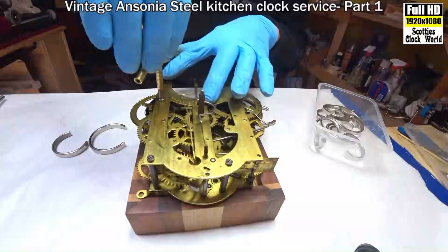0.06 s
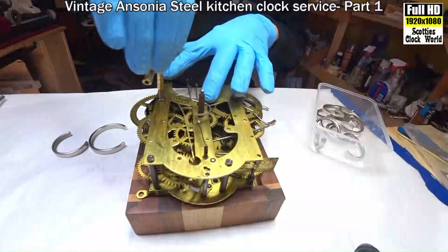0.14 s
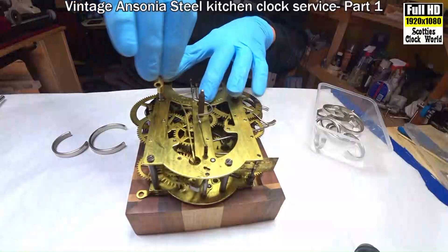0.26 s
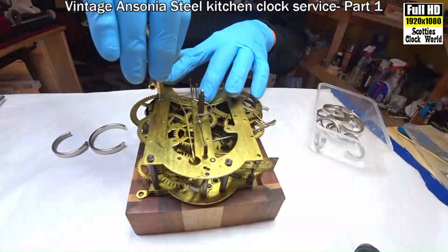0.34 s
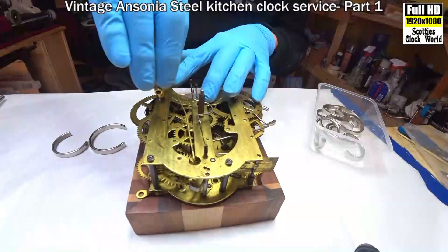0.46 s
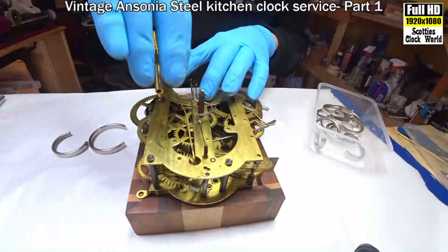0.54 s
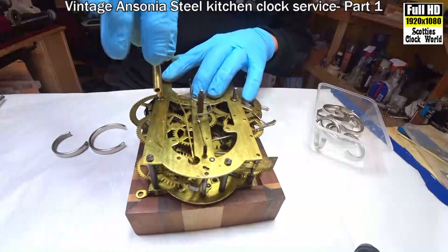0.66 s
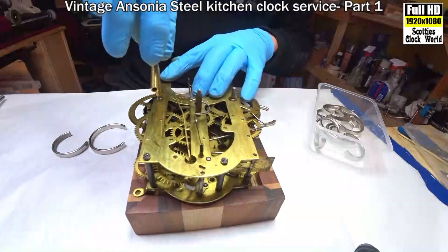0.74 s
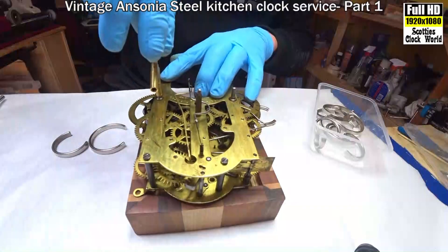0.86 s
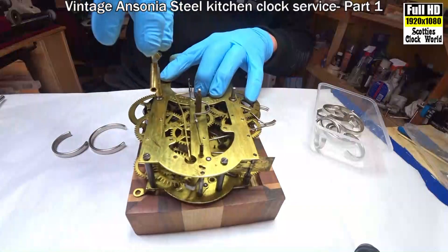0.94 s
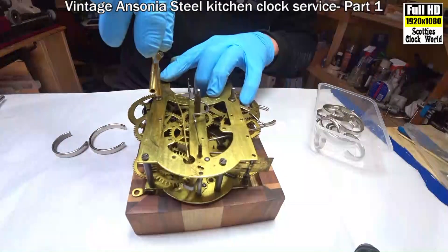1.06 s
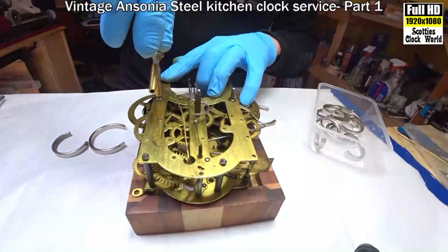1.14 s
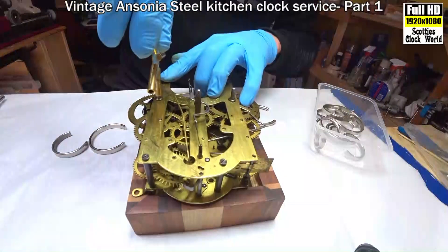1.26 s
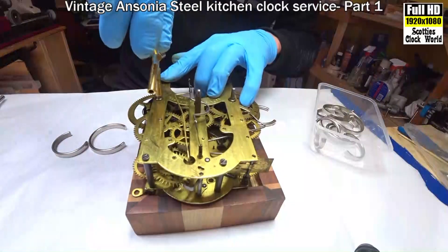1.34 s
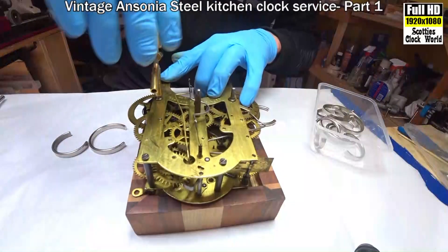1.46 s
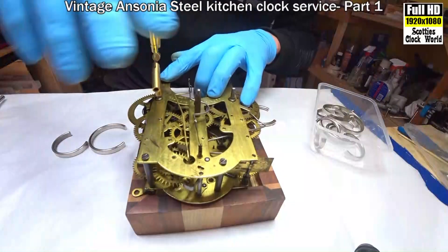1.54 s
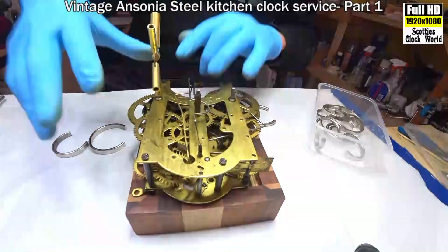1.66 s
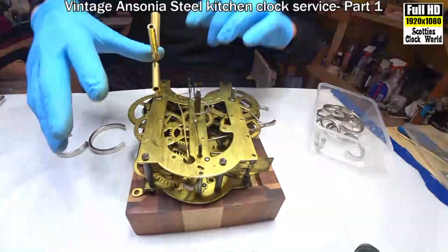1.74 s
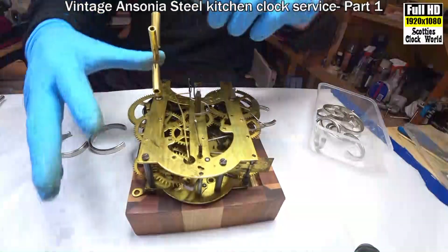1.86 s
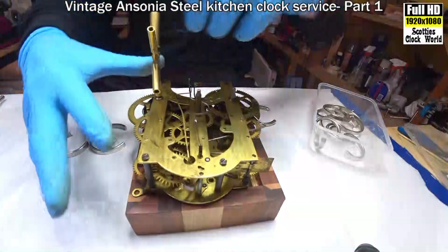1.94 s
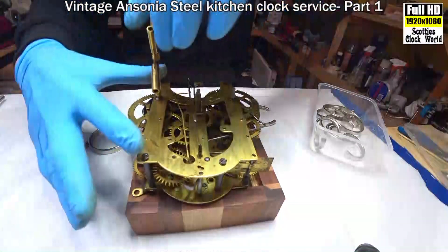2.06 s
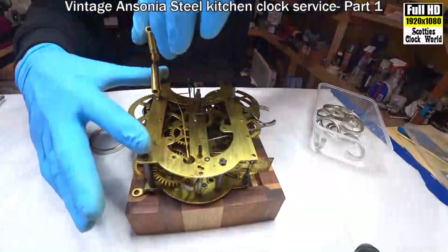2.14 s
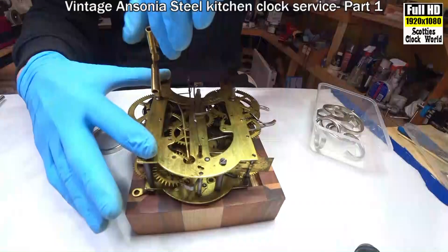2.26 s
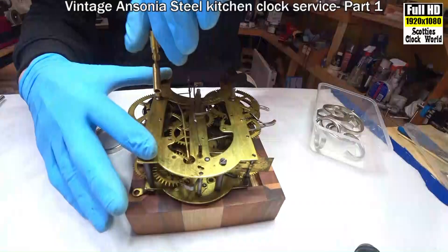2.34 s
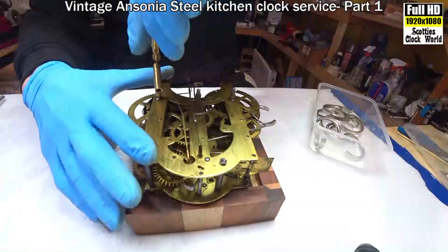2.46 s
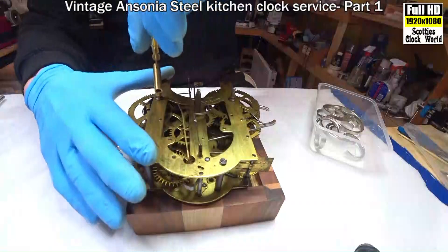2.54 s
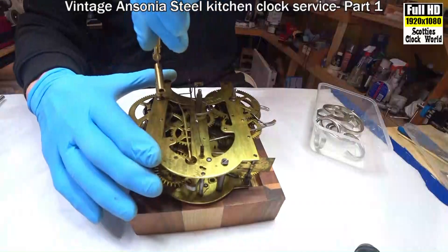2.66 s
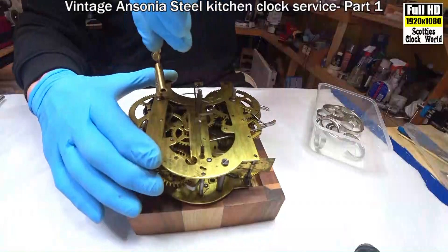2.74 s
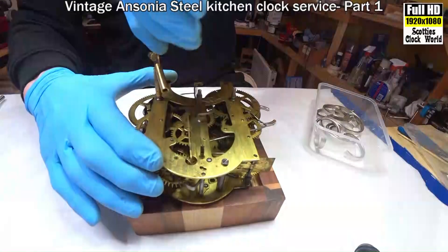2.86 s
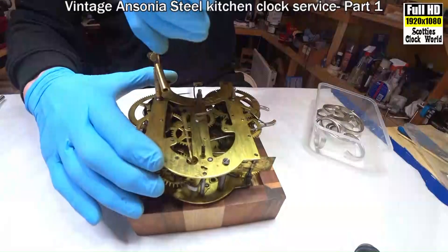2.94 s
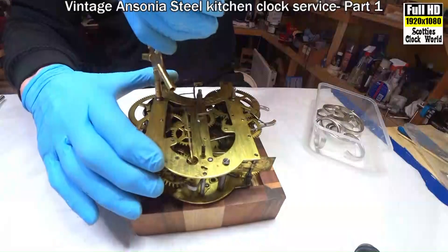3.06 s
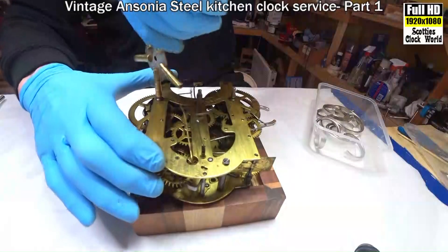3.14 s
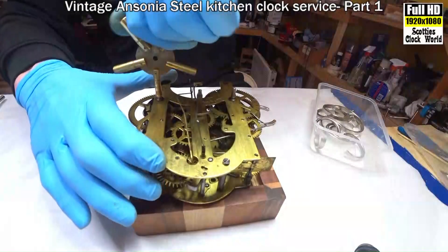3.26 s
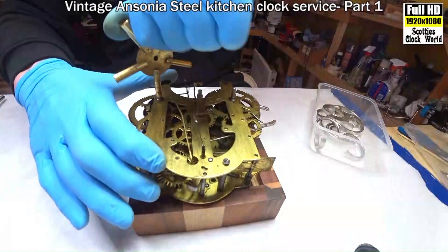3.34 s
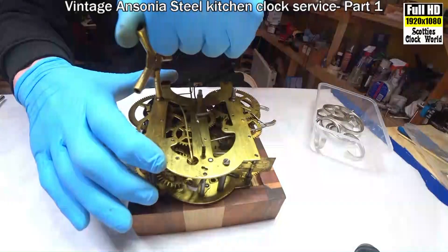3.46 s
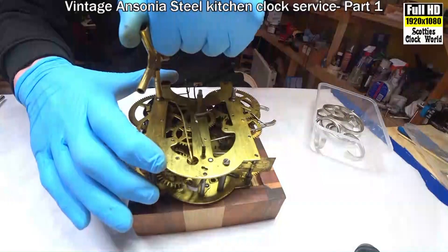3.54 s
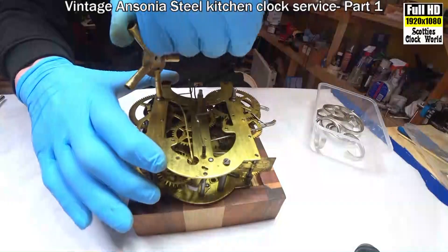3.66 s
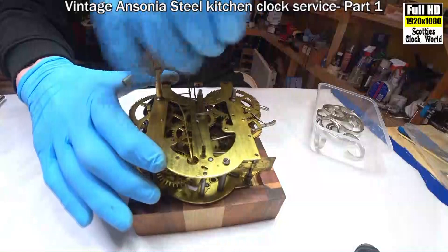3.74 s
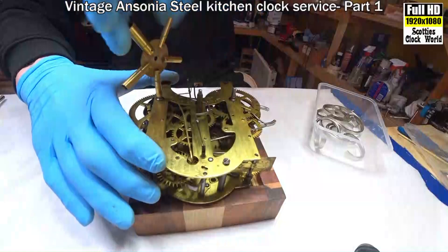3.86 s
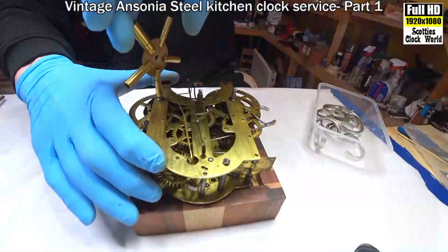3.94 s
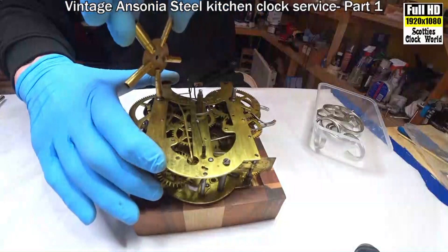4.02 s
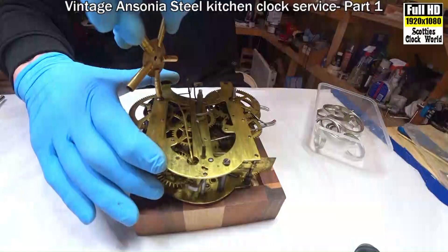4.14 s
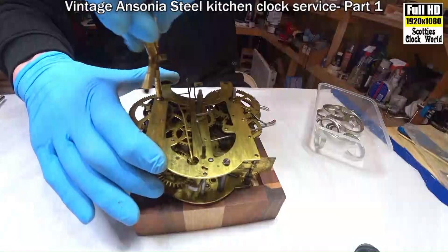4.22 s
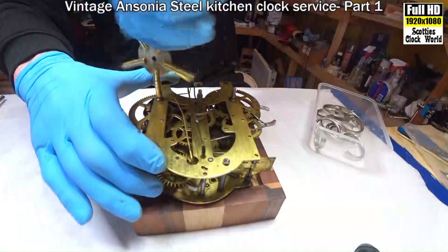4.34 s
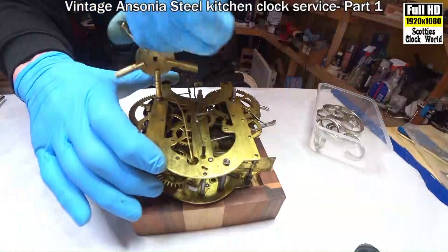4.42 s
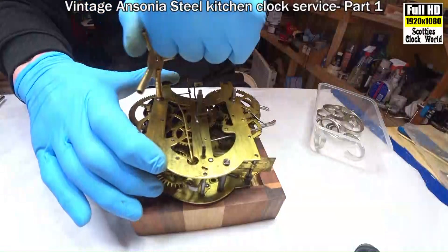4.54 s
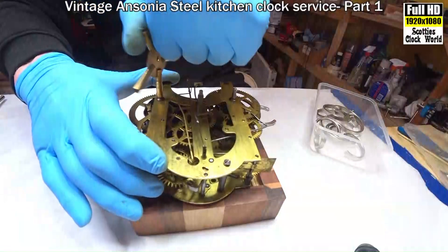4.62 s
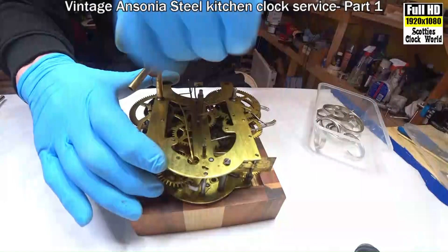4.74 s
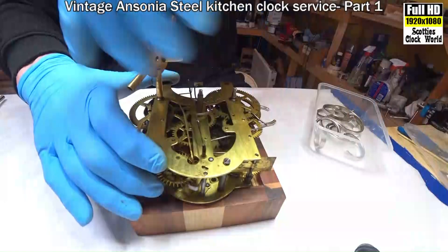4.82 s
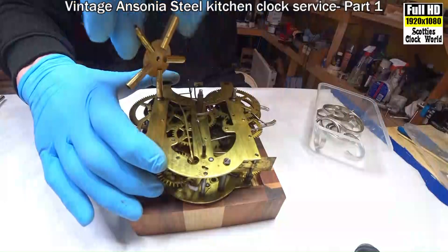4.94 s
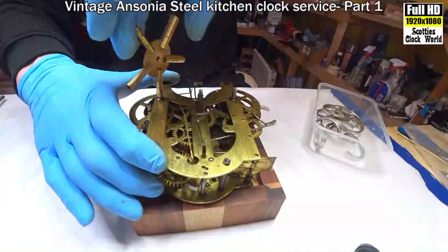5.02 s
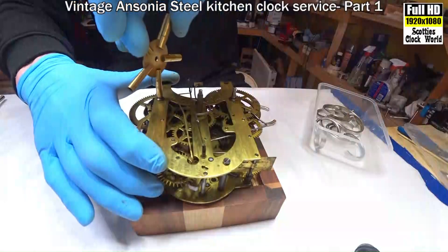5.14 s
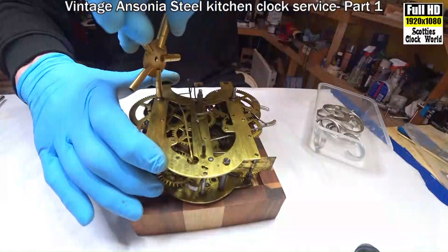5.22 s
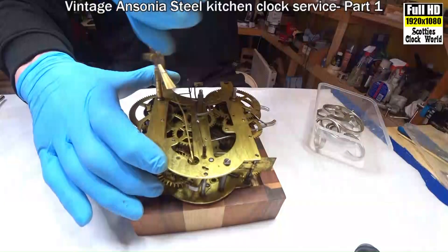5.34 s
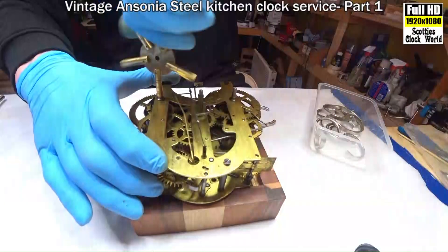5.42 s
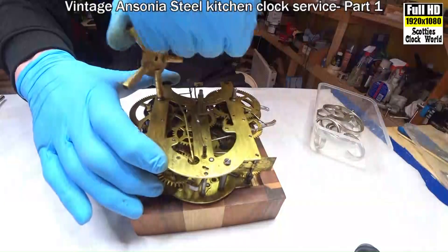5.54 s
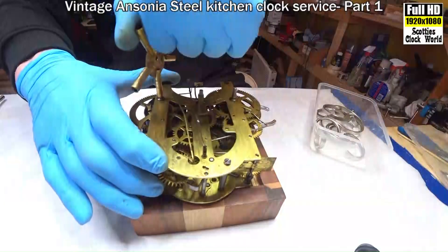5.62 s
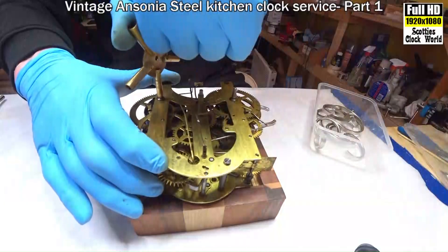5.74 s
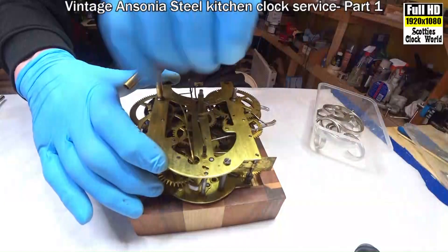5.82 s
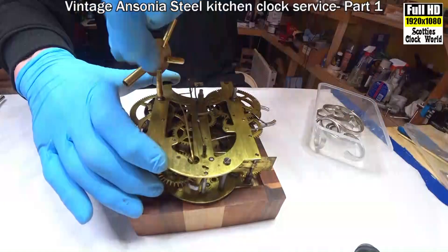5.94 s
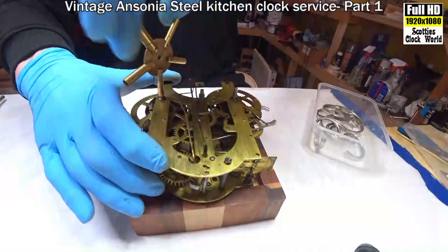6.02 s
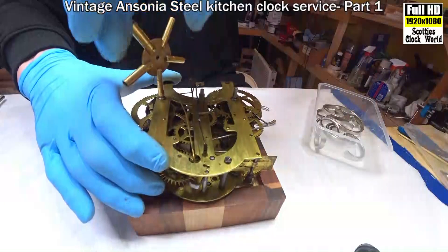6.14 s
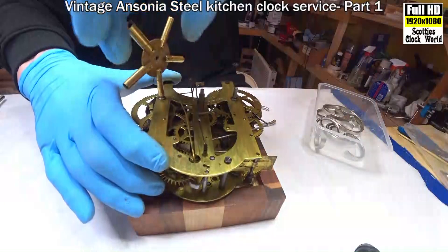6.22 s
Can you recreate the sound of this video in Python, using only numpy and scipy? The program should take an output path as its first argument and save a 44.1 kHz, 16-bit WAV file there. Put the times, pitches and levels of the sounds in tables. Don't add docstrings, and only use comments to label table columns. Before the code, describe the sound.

Dull wooden knocks and light brass ticks, then a key winds a clock spring in three bursts of sharp, bright ratchet clicks.

```python
import sys
import numpy as np
from scipy import signal
from scipy.fft import rfft, irfft, next_fast_len
from scipy.io import wavfile
from scipy.ndimage import uniform_filter1d

SR = 44100
rng = np.random.default_rng(int(sys.argv[2]) if len(sys.argv) > 2 else 0)


def volts_from_decibels(level):
    exponent = np.asarray(level, float) / 20
    return 10 ** exponent


def file_out(sig):
    cols = np.atleast_2d(sig).T
    lim = np.clip(cols, -1, 1)
    pcm = np.round(lim * 32767).astype(np.int16)
    wavfile.write(sys.argv[1], SR, pcm)


N = 277334

# frequency in Hz, T60 in seconds, level in dB.
BENCH_MODES = [(42.8, 0.29, 2.5), (69.58, 1, -18.5), (105.9, 0.32, -0.5), (154, 0.86, -10.5),
               (177.4, 0.13, 3), (240, 0.44, -3), (295.5, 0.34, -0.5), (349.4, 0.086, 2.5),
               (415.7, 0.43, -2.5), (502, 0.096, 4.5), (560.4, 0.21, -2), (595, 0.08, -7), (803, 0.14, -7),
               (894, 0.18, -7.5), (1040, 0.093, -11.5)]
# frequency in Hz, bandwidth in Hz, level in dB.
PLATE_MODES = [(820, 300, -4.5), (1213, 263, -0.5), (1560, 445, 0), (2050, 257, -3), (2500, 460, -0.5),
               (2980, 600, -3)]
# start in seconds, end in seconds, torque in dB.
KEY_TURNS = [
    (3.066, 3.505, -45.5),
    (4.114, 4.586, -42.5),
    (5.204, 5.668, -42.5),
]
FIRST_TAP_DB = 3.0


def curve(hz, table):
    points = np.array(table)
    return np.interp(np.log(hz + 1), np.log(points[:, 0]), points[:, 1])


def bell(f, hz, octaves):
    return np.exp(-(np.log2((f + 1) / hz) / octaves) ** 2)


def shape(x, gain):
    size = next_fast_len(len(x) + 512)
    f = np.arange(size // 2 + 1) * SR / size
    return irfft(rfft(x, size) * gain(f), size)[:len(x)]


def unit(x):
    return x / np.sqrt(np.mean(x ** 2))


def rings(hz, t60, db, seconds):
    t = np.arange(int(seconds * SR))[:, None] / SR
    ways = (-1) ** np.arange(len(hz))
    decay = np.exp(-np.log(1000) * t / t60)
    return (ways * volts_from_decibels(db) * decay * np.sin(2 * np.pi * hz * t)).sum(axis=1)


def chatter(ms, rise, spike_db, seconds):
    t = np.arange(int(seconds * SR)) / SR * 1000 / max(ms, .2)
    force = np.minimum(rng.exponential(size=len(t)), 3)
    impacts = rng.standard_normal(len(t)) * volts_from_decibels(spike_db * force)
    return impacts * (1 - np.exp(-t / rise)) ** 2 * np.exp(-t)


def landing(bounces, first_db, delay_ms):
    blow = np.arange(len(bounces)) == int(delay_ms * SR / 1000)
    return bounces + blow * volts_from_decibels(first_db) * np.sqrt(np.sum(bounces ** 2))


def grains(per_s, spike_db):
    size = np.minimum(rng.exponential(size=N), 3)
    return (rng.random(N) < per_s / SR) * rng.standard_normal(N) * volts_from_decibels(spike_db * size)


def add(out, s, sound, db):
    i = int(s * SR)
    sound = sound * volts_from_decibels(db) / np.sqrt(np.sum(sound ** 2))
    out[i:i + len(sound)] += sound[:N - i]


def ratchet():
    # drop off a tooth (at 4.62 s the key let go) in seconds, snap in dB, wheel band in dB, plate ring
    # in Hz, plates in dB.
    snaps = [(3.154, -9.5, -45, 2170, -32), (3.212, -10.5, -42, 3650, -30.5),
             (3.272, -13, -42, 1600, -31.5), (3.3201, -15.5, -42, 3840, -30.5),
             (3.352, -28, -35, 2480, -36.5), (3.375, -12.5, -41, 2180, -32), (3.447, -11, -33, 1560, -29),
             (3.5883, -20, -29.5, 1560, -27), (4.2174, -10.5, -24.5, 3750, -25.5),
             (4.2627, -10.5, -21.5, 2300, -29.5), (4.2995, -9.5, -23.5, 3060, -28),
             (4.344, -11, -25, 3960, -28), (4.3856, -13.5, -32, 2240, -29), (4.425, -13, -33, 2500, -26.5),
             (4.46, -11, -24, 4000, -28), (4.5155, -13, -25.5, 2200, -28.5), (4.6162, -22, -47, 3970, -29),
             (4.6206, -15, -38, 3960, -34.5), (5.2956, -12, -37, 2500, -29),
             (5.3355, -12, -43, 2140, -30.5), (5.3676, -7, -43, 4030, -29.5),
             (5.4015, -7, -39, 4060, -28.5), (5.443, -9, -47, 2300, -29.5), (5.476, -11.5, -41, 4000, -27),
             (5.5147, -15.5, -27.5, 3820, -31.5), (5.5965, -11, -39, 1770, -31)]
    # pawl resonance in Hz, bandwidth in Hz, level in dB.
    pawl = [(830, 210, 0), (1600, 114, -1.5), (2300, 190, -4.5), (2980, 570, -14.5), (3780, 126, -5),
            (4060, 360, -0.5), (5960, 300, -13), (6800, 1300, -6), (8550, 560, -1), (9410, 310, -6.5),
            (10860, 400, 2), (10970, 310, -2.5), (11740, 260, -4.5), (12200, 1100, -6)]
    note_hz, note_spread = 10000, 0.03
    first_blow_db, first_plate_db = -8.5, 1.5
    rattle_ms, rattle_db = 55, -15.5
    out, (hz, width, db) = np.zeros(N), np.transpose(pawl)
    for s, peak_db, wheel_db, plate_hz, plate_db in snaps:
        chance = rng.standard_normal((2, len(hz) + 1))
        ring_hz = note_hz * (1 + note_spread * chance[0, -1])
        body = rings(hz * (1 + .005 * chance[0, :-1]), 2.2 / width, db + 2.5 * chance[1, :-1], .03)
        body += rings(np.array([ring_hz, plate_hz]), np.array([.004, .012]), np.array([-3.0, -1.5]), .03)
        body[0] += volts_from_decibels(21.5)
        bounces = chatter(1.37, 0.1, 0.58, .03)
        bounces[3] += volts_from_decibels(first_blow_db) * np.sqrt(np.sum(bounces ** 2))
        snap = signal.fftconvolve(bounces, body)
        late = signal.fftconvolve(landing(chatter(1.6, .5, 1.8, .03), first_plate_db, .8), body)

        lift = shape(chatter(0.92, 0.55, 1.8, .01), lambda f: bell(f, 7400, 1.5))
        crack = shape(snap, lambda f: bell(f, 10470, 0.62))
        wheel = shape(snap, lambda f: bell(f, 6160, 0.19))
        answer = shape(late, lambda f: bell(f, 2890, 0.74) + .8 * bell(f, plate_hz, .2)
                       + 0.33 * bell(f, 910, 0.69))
        rattle = shape(chatter(rattle_ms, 0.96, 6.4, 0.12), lambda f: bell(f, 9000, 1.0))
        add(out, s - .0015, lift, peak_db - 20.0)
        add(out, s - .0001, crack, peak_db + 11)
        add(out, s - .0001, wheel, wheel_db + 18.0)
        add(out, s - .0001, answer, plate_db + 19.5)
        add(out, s + 0.001, rattle, peak_db + rattle_db)
    return out


def knocks():
    # time in seconds, peak in dB, loudest mode in Hz, hardness in dB.
    hard_knocks = [(0.451, -22.5, 330, -12), (0.802, -49.5, 91.5, 3.5), (1.509, -35, 230, -16),
                   (1.859, -23.5, 222, -12), (1.943, -25, 90, -14), (2.31, -31.5, 107, -21.5),
                   (2.347, -32, 108, -12.5), (2.773, -32.5, 121, -14), (2.961, -30, 337, -23),
                   (3.106, -38, 105, -7.5), (3.55, -44, 550, 3.5), (3.585, -28, 93.5, -16),
                   (3.694, -37, 173, -14), (3.781, -28.5, 310, -12), (3.862, -22, 460, -13.5),
                   (4.029, -23.5, 122, -18), (4.611, -27, 310, -9), (4.892, -21.5, 92, -16),
                   (5.045, -21, 227, -20), (5.288, -25.5, 296, -14), (5.674, -27, 96, -15.5),
                   (5.896, -28, 153, -15), (5.909, -14.5, 218, -19), (6.053, -27.5, 240, -18),
                   (6.099, -19, 212, -17.5), (6.264, -24.5, 105, -19)]
    # time in seconds, peak in dB, loudest mode in Hz.
    thumps = [(0.176, -27, 195), (0.269, -37.5, 107), (0.409, -31, 280), (0.624, -29, 154),
              (0.699, -33, 94), (1.986, -30.5, 264), (2.113, -32.5, 103), (3.817, -26, 233),
              (3.921, -27, 216), (4.098, -30, 95), (4.645, -26.5, 101), (4.801, -33, 100),
              (5.775, -35, 106), (5.915, -22.5, 104), (6.199, -36, 103)]
    # time in seconds, level in dB.
    sways = [(0.19, -32), (0.279, -39), (0.422, -35), (0.462, -34), (0.635, -37), (0.708, -35.5),
             (0.812, -40), (1.516, -47), (1.871, -36), (1.999, -41), (3.598, -30), (3.707, -41),
             (3.83, -44), (3.874, -42), (4.107, -35), (4.623, -38), (4.657, -44), (5.301, -35),
             (5.689, -37.5), (5.921, -37), (6.063, -42), (6.113, -41), (6.211, -47)]
    thump_hard_db, scuff_db = -26, 12.5
    first_contact_s = 0.0058
    out, (hz, t60, db) = np.zeros(N), np.transpose(BENCH_MODES)
    legs = hz < 70
    low, high = ~legs & (hz < 350), hz > 350
    for s, peak_db, near_hz, hard_db in [*hard_knocks, *[(*row, thump_hard_db) for row in thumps]]:
        place_db = db + 8.4 * bell(hz, near_hz, 0.17) + 2.56 * rng.standard_normal(len(hz))
        push = chatter(13.0, 0.036, 3.17, .08)
        contact = np.exp(-np.arange(len(push)) / SR / first_contact_s)
        sharp = landing(push * contact, FIRST_TAP_DB, 3.0)
        for modes, part_db, force in [(low, 0, push), (high, hard_db + 5, sharp)]:
            body = rings(hz[modes], 0.48 * t60[modes], place_db[modes], 0.3)
            add(out, s - .003, signal.fftconvolve(force, body), peak_db + part_db + 19.0)
        scuff = shape(chatter(18.0, 1.8, 1.5, 0.12), lambda f: bell(f, 670, 1.0))
        add(out, s - .003, scuff, peak_db + hard_db + scuff_db)
    for s, sway_db in sways:
        body = rings(hz[legs], 0.79 * t60[legs], db[legs], 0.36)
        add(out, s - .003, signal.fftconvolve(chatter(12.0, 0.07, 3.8, .08), body), sway_db + 25.0)
    return out


def ticks():
    # time in seconds, peak in dB, ring in Hz, contact in ms.
    plate_ticks = [(0.453, -25.5, 5540, 4.7), (0.7037, -37.5, 2640, 6.6), (1.104, -44.5, 3100, 5.5),
                   (1.513, -33.5, 7560, 3.4), (1.863, -31.5, 6800, 9.2), (1.946, -41, 7200, 9.7),
                   (2.7596, -40, 4500, 4.3), (2.802, -32.5, 5000, 4.8), (2.847, -39, 4340, 7),
                   (2.966, -25, 2360, 3.5), (3.1158, -36.5, 3550, 9.6), (3.5899, -17, 1940, 5.4),
                   (3.758, -37, 11100, 2.2), (3.7809, -36, 2570, 5.9), (4.1644, -29, 3620, 11),
                   (4.1724, -28, 3520, 8.5), (4.2492, -31, 11200, 8.2), (4.8895, -36, 8640, 5),
                   (5.256, -32, 3640, 8.9), (5.6521, -28, 2400, 8.1), (5.8996, -31, 8250, 7.5),
                   (5.91, -27, 3680, 12), (5.9492, -39.5, 4340, 3.1), (6.053, -36, 4140, 2.7),
                   (6.0786, -37, 10870, 1.7), (6.105, -41, 3870, 2.3), (6.265, -45, 2750, 4.6)]
    # time in seconds, peak in dB, ring in Hz, contact in ms.
    key_ticks = [(0.633, -38.5, 5200, 1.6), (0.8064, -18, 3280, 4.9), (0.927, -43, 8950, 4.6),
                 (0.9622, -36, 10200, 3.5), (1.4798, -38, 3360, 4.1), (1.5415, -33, 2770, 19),
                 (2.309, -42.5, 2800, 3.2), (2.684, -44, 3920, 3.1), (2.7395, -25.5, 3620, 8),
                 (2.866, -35, 4060, 10), (3.001, -39, 6500, 2), (3.254, -23, 9520, 2.1),
                 (3.5562, -18.5, 8000, 4.5), (3.623, -37, 6100, 3.6), (3.715, -35.5, 4300, 3.4),
                 (3.738, -35, 2580, 5.2), (3.8098, -37, 7900, 3), (3.861, -32.5, 2500, 17),
                 (4.034, -34, 5570, 4.2), (4.4434, -17, 8400, 13), (4.585, -32.5, 3600, 5.2),
                 (4.6121, -15, 7000, 13.6), (4.729, -34, 6400, 5.1), (4.913, -35.5, 5710, 2.9),
                 (5.5733, -39, 7600, 6.2), (5.634, -29, 9600, 4.4), (5.688, -32.5, 3140, 4.6),
                 (5.7845, -26.5, 6200, 1.7), (5.879, -35.5, 1500, 4.7)]
    dull_plate_db, dull_key_db = -17.5, -26.5
    first_touch_db = -3.0
    out, (hz, width, db) = np.zeros(N), np.transpose(PLATE_MODES)
    touches = [(*row, dull_plate_db) for row in plate_ticks]
    touches += [(*row, dull_key_db) for row in key_ticks]
    for s, peak_db, ring_hz, ms, dull_db in touches:
        touch = landing(chatter(.5 * ms, .3, 2.4, .06), first_touch_db - ms / 2, 1.1)
        plates = rings(hz, 1.3 / width, db + 2.5 * rng.standard_normal(len(hz)), .03)
        grit = shape(touch, lambda f: 2.9 * bell(f, ring_hz, 0.21) + .5 * bell(f, ring_hz, 1.0)
                     + volts_from_decibels(-1.0) * bell(f, 5100, 2.3))
        add(out, s - .0009, grit, peak_db + 9.5)
        add(out, s - .0009, signal.fftconvolve(touch, plates), peak_db + dull_db + 26.5)
    return out


def taps():
    # time in seconds, peak in dB, loudest mode in Hz.
    edge_taps = [(0.176, -45, 794), (0.453, -30, 474), (0.622, -51, 495), (0.702, -41, 980),
                 (0.808, -38.5, 880), (1.51, -38.5, 510), (1.862, -40, 487), (1.944, -33.5, 506),
                 (2.306, -53, 517), (2.775, -45, 480), (2.788, -46, 476), (2.794, -38, 733),
                 (2.964, -47, 924), (3.589, -36, 544), (3.78, -39, 466), (3.823, -44, 487),
                 (3.862, -34.5, 480), (4.034, -39.5, 512), (4.616, -33, 616), (4.893, -37, 526),
                 (5.046, -40, 514), (5.676, -44, 570), (5.9, -35, 480), (5.912, -36, 482),
                 (6.055, -45, 506), (6.103, -35.5, 485), (6.263, -39, 475)]
    tap_ms, ring_scale, tap_db = 2.5, 0.43, 19.5
    out, (hz, t60, db) = np.zeros(N), np.transpose(BENCH_MODES)
    upper = hz > 400
    upper_db = db[upper] + 4.9 * bell(hz[upper], 930, 0.26)
    for s, peak_db, near_hz in edge_taps:
        decay_s = ring_scale * np.append(t60[upper], .15)
        body = rings(np.append(hz[upper], near_hz), decay_s, np.append(upper_db, 5.0), .12)
        touch = landing(chatter(tap_ms, 0.18, 2.9, .02), FIRST_TAP_DB, .9)
        add(out, s - .001, signal.fftconvolve(touch, body), peak_db + tap_db)
    return out


def key_rings():
    # time in seconds, frequency in Hz, T60 in seconds, peak in dB.
    long_rings = [
        (4.622, 14124, .22, -43),
        (3.558, 6700, .07, -40),
        (2.40, 11250, .2, -66),
        (4.93, 11250, .2, -64),
    ]
    out = np.zeros(N)
    for s, ring_hz, t60, peak_db in long_rings:
        out[int(s * SR):][:int(.3 * SR)] += rings(np.array([ring_hz]), t60, peak_db, .3)
    return out


def pecks():
    # time in seconds, peak in dB, ring in Hz.
    small_pecks = [(.102, -57, 4000), (.17, -45, 3600), (.242, -45.5, 3130), (.281, -45.5, 4540),
                   (.31, -46, 4300), (.551, -39.5, 2210), (.59, -45, 6060), (.646, -46, 4500),
                   (1.02, -48, 3960), (1.222, -52, 9300), (1.386, -46, 6700), (1.411, -43, 3260),
                   (1.80, -44, 2540), (2.293, -43, 6500), (2.333, -43, 4500), (2.50, -49, 7000),
                   (2.535, -51, 7000), (2.595, -50, 4000), (2.838, -41, 9000), (2.952, -47, 4000),
                   (3.012, -43, 6500), (3.038, -52, 2400), (3.08, -46, 2000), (3.093, -41, 2010),
                   (3.128, -41, 3400), (3.68, -44, 4700), (3.819, -41, 7000), (3.872, -44, 4800),
                   (3.937, -43, 4500), (3.975, -46, 2430), (4.003, -44, 2400), (4.14, -47, 2080),
                   (4.164, -33, 9000), (4.174, -41, 11000), (4.184, -40, 8000), (4.65, -34, 3680),
                   (4.755, -44, 4500), (4.805, -40, 2990), (4.832, -47, 4300), (4.962, -50, 2500),
                   (5.022, -43.5, 5030), (5.046, -38.5, 2540), (5.116, -43, 3900), (5.177, -48, 3100),
                   (5.204, -48, 3550), (5.226, -45, 3000), (5.278, -29, 7000), (5.309, -31, 7000),
                   (5.318, -34, 3500), (5.491, -36, 1500), (5.412, -30, 5600), (5.664, -31, 2050),
                   (5.678, -38, 4800), (5.74, -42, 6500), (5.87, -46, 6900), (5.918, -28.5, 7240),
                   (6.015, -50, 4500), (6.113, -34, 6500), (6.138, -48, 5000),
                   (3.5505, -35, 4500), (3.5562, -30, 8800), (3.586, -40, 6000), (3.622, -32, 12500),
              (2.760, -40, 10000), (2.800, -46, 10000), (2.817, -49, 12000), (2.828, -46, 7000),
              (2.843, -43, 6000), (2.849, -35, 5000), (2.854, -43, 5000), (2.869, -40, 5500),
              (2.875, -42, 4500), (2.936, -46, 5000), (3.001, -40, 10500), (3.011, -41, 9500),
              (.476, -49, 6000), (.512, -46, 6000), (.641, -48, 4500), (.648, -42, 5500), (.807, -23, 4200),
              (.72, -48, 5000), (5.048, -40, 1600), (3.782, -38, 1700), (2.79, -42, 1800),
              (5.657, -35, 2000), (.457, -36, 3300), (3.59, -27, 1500), (5.95, -43, 3000)]
    peck_ms, peck_octaves = 1.6, 0.59
    out = np.zeros(N)
    for s, peak_db, ring_hz in small_pecks:
        touch = chatter(peck_ms, 0.39, 4.1, .03)
        peck = shape(touch, lambda f: bell(f, ring_hz, peck_octaves) + .15 * bell(f, 5000, 1.5))
        add(out, s - .0005, peck, peak_db + 9)
    return out


def rubs():
    # start in seconds, end in seconds, colour in Hz, level in dB.
    glove_rubs = [(0.124, 0.3, 3000, -69), (0.437, 0.475, 4000, -52.5), (0.506, 0.59, 4130, -59.5),
                  (0.582, 0.773, 4150, -58), (0.807, 1.15, 4930, -67), (1.432, 1.594, 4730, -58),
                  (1.606, 1.67, 3520, -61), (1.742, 2.05, 3940, -59.5), (2.285, 2.474, 4730, -63.5),
                  (2.738, 2.842, 4830, -58), (2.82, 2.947, 4030, -49.5), (2.93, 3.037, 5000, -70),
                  (3.527, 3.681, 3720, -57.5), (3.606, 3.94, 5600, -57), (3.873, 4.042, 4750, -61),
                  (4.144, 4.208, 3000, -49.5), (4.578, 4.68, 4630, -49), (4.635, 4.84, 6300, -55.5),
                  (4.818, 4.943, 5500, -58.5), (5.578, 5.771, 2400, -55.5), (5.73, 5.884, 6400, -56),
                  (5.844, 6.005, 4530, -61), (5.96, 6.05, 3000, -63), (6.061, 6.143, 4160, -55),
                  (6.126, 6.235, 2400, -65)]
    # start in seconds, end in seconds, plate in Hz, level in dB.
    squeaks = [(0.265, .36, 2720, -73), (0.627, 0.736, 2500, -66), (1.016, 1.1, 3500, -70),
               (2.628, 2.678, 3040, -64), (2.874, 2.925, 4500, -54.5), (2.963, 3.03, 2500, -66),
               (3.603, 3.685, 2300, -63), (3.74, 3.897, 2500, -73), (3.922, 4.016, 2450, -68),
               (4.68, 4.73, 2050, -73), (4.782, 4.933, 2500, -70), (4.98, 5.057, 2400, -65),
               (5.246, 5.293, 3750, -51.5), (5.248, 5.291, 2240, -50.5), (5.622, 5.72, 2050, -59),
               (5.914, 6.0, 2100, -70), (6.09, 6.177, 2670, -64)]
    rub_octaves, squeak_octaves, turn_octaves = 2.5, 0.28, 0.93
    grind_hz, grind_db, spring_hz, spring_db = 1160, -15.5, 7000, -12
    hum_hz, hum_gain = (2250, 3750), .7
    out, slips = np.zeros(N), grains(4500, 2.0)
    flutter = volts_from_decibels(3.2 * unit(uniform_filter1d(rng.standard_normal(N), 350)))
    slides = [(*row, rub_octaves) for row in glove_rubs]
    slides += [(*row, squeak_octaves) for row in squeaks]
    for start, end, db in KEY_TURNS:
        slides.append((start, end, grind_hz, db + grind_db, turn_octaves))
        slides.append((start, end, spring_hz, db + spring_db, turn_octaves))

    def plate_hum(f):
        return 1 + hum_gain * sum(bell(f, hz, 0.21) for hz in hum_hz)

    for start, end, colour_hz, db, octaves in slides:
        i, j = int(start * SR), int(end * SR)
        grit = unit(shape(slips[i:j], lambda f: bell(f, colour_hz, octaves) * plate_hum(f)))
        out[i:j] += volts_from_decibels(db) * grit * signal.windows.tukey(j - i, .8) * flutter[i:j]
    return out


def hands():
    # time in seconds, level in dB.
    grip_points = [(0, -62.5), (.55, -57.5), (.8, -51.5), (1.2, -65), (1.75, -61), (2.0, -56.5),
                   (2.42, -64.5), (2.7, -63), (3.02, -52), (3.65, -51.5), (3.8, -52.5), (4.05, -55.5),
                   (4.7, -64), (4.85, -48), (5.2, -59), (5.7, -58), (5.8, -57.5), (6.29, -51)]
    grip_creak_db, turn_creak_db = -4.5, -5
    t = np.arange(N) / SR
    grip = volts_from_decibels(np.interp(t, *np.transpose(grip_points)))
    torque = np.zeros(N)
    for start, end, db in KEY_TURNS:
        progress = np.clip((t - start) / (end - start), 0, 1)
        torque += volts_from_decibels(db) * np.maximum(np.sin(np.pi * progress), 0) ** 0.5
    hz, t60, db = np.transpose(BENCH_MODES)
    wood = rings(hz, 0.16 * t60, db + 6.3 * bell(hz, 380, 1.0), .4)
    wood = wood / np.sqrt(np.sum(wood ** 2))
    rumble = signal.fftconvolve(unit(grains(300, 3.3)) * (grip + torque), wood)[:N]
    hz, width, db = np.transpose(PLATE_MODES)
    creak = unit(signal.fftconvolve(grains(3500, 2.6), rings(hz, 1.3 / width, db, .03))[:N])
    patchy_db = 3.5 * unit(uniform_filter1d(rng.standard_normal(N), 900))
    strain = volts_from_decibels(grip_creak_db) * grip + volts_from_decibels(turn_creak_db) * torque
    return rumble + volts_from_decibels(patchy_db - 9.5) * strain * creak


def two_ports(near):
    # frequency in Hz, left minus right in dB.
    port_db = [(100, .2), (500, -.2), (1000, 1), (4000, .7), (8000, 2.8), (13000, 3.8)]
    # frequency in Hz, phase by which left leads in radians.
    port_lead = [(0, 0), (250, -.5), (950, -1.05), (2000, -.65), (4000, -.25), (8900, -.2), (10500, .4),
                 (16500, .8)]

    def port(way):
        def gain(f):
            turn = np.exp(.5j * way * np.interp(f, *np.transpose(port_lead)))
            return volts_from_decibels(way * curve(f, port_db) / 2) * turn
        return shape(near, gain)

    return [port(1), port(-1)]


def echo(x):
    t60_s, level_db, top_hz = 0.11, -16, 11400
    t = np.arange(int(.3 * SR)) / SR
    tail = rng.standard_normal(len(t)) * np.exp(-np.log(1000) * t / t60_s) * (t > .003)
    tail = shape(tail, lambda f: f / (f + 400) / (1 + (f / top_hz) ** 2))
    return signal.fftconvolve(x, tail / np.sqrt(np.sum(tail ** 2)))[:N] * volts_from_decibels(level_db)


def room_tone():
    # frequency in Hz, in-phase density in dB per Hz.
    mid_density = [(15, -45), (25, 4), (167, -6.5), (202, 3.5), (313, -36), (538, -13.5), (634, -12),
                   (706, -14.5), (2270, -21.5), (3320, -23.5), (3600, -23.5), (14500, -28), (16500, -49)]
    # frequency in Hz, opposite-phase density in dB per Hz.
    side_density = [(15, -69), (25, -61), (146, -7.5), (296, -15), (349, -8), (470, -9.5), (553, -9),
                    (600, -8.5), (1180, -10.5), (14800, -37.5), (16500, -62)]
    mid_db, side_db = -59, -58.5
    mid = unit(shape(rng.standard_normal(N), lambda f: volts_from_decibels(curve(f, mid_density))))
    side = unit(shape(rng.standard_normal(N), lambda f: volts_from_decibels(curve(f, side_density))))
    drift_db = 1.5 * unit(uniform_filter1d(rng.standard_normal(N), 9000))
    return volts_from_decibels(mid_db + drift_db) * mid + volts_from_decibels(side_db) * side * np.array([[1], [-1]])


def scene():
    treble_edge_hz, treble_loss_db = 15650, -15
    near = ratchet() + knocks() + ticks() + taps() + key_rings() + pecks() + rubs() + hands()
    near = shape(near, lambda f: volts_from_decibels(treble_loss_db / (1 + np.exp((treble_edge_hz - f) / 200))))
    return np.array([port + echo(near) for port in two_ports(near)]) + room_tone()


def roll_off(x):
    return signal.sosfilt(signal.butter(12, 16970, fs=SR, output="sos"), x)


def record(dry):
    rounded = 0.9 * np.tanh(dry / 0.95)
    bass_cut = signal.butter(3, 35, "high", fs=SR, output="sos")
    top_cut = signal.ellip(8, .3, 70, 16500, fs=SR, output="sos")
    mix = signal.sosfilt(np.vstack([bass_cut, top_cut]), rounded)
    return roll_off(mix)


dry = scene()
out = record(dry)
file_out(out)
```